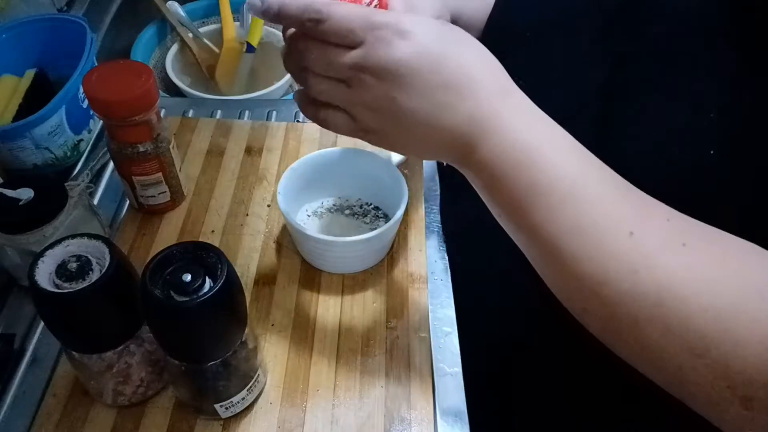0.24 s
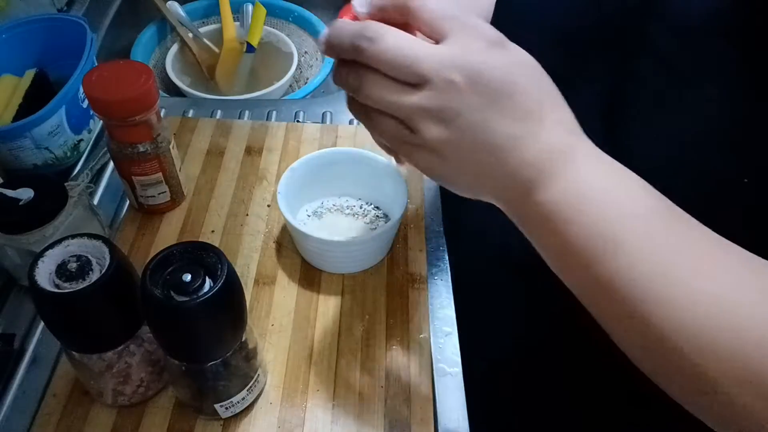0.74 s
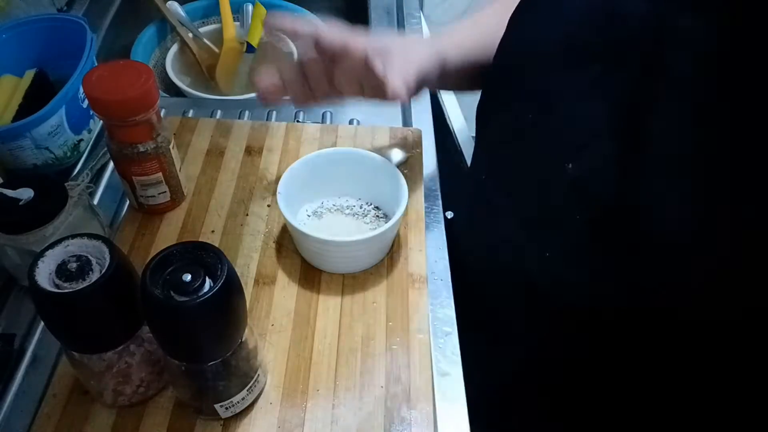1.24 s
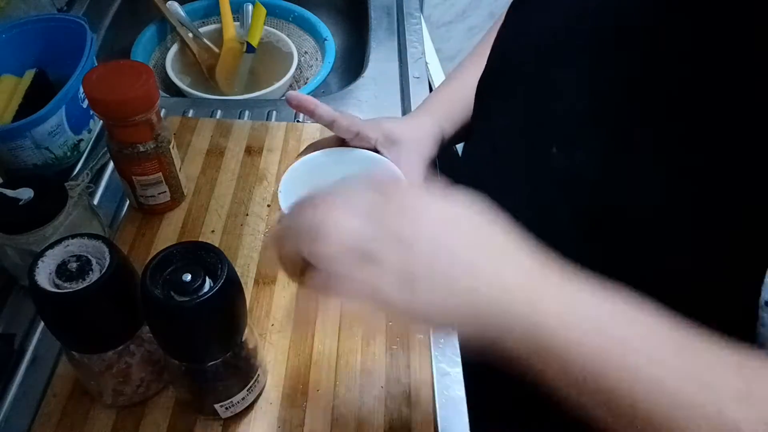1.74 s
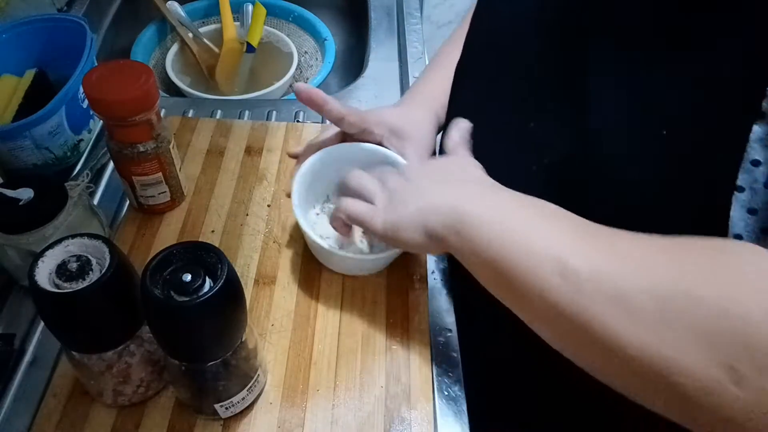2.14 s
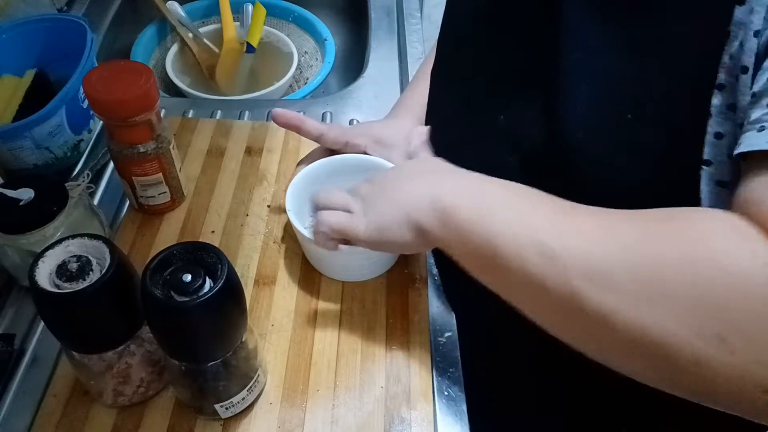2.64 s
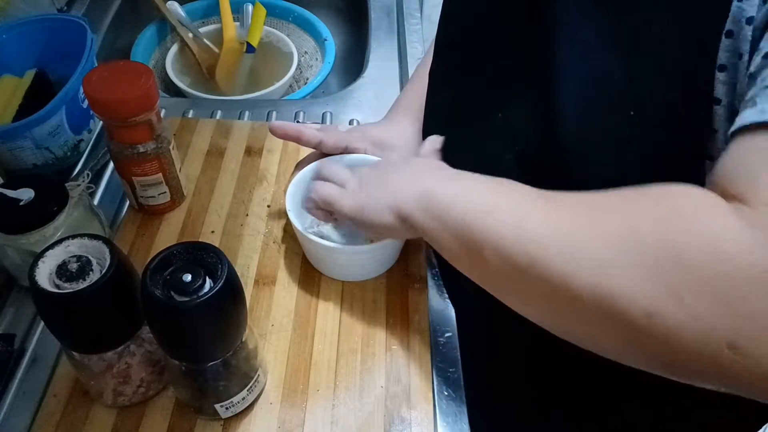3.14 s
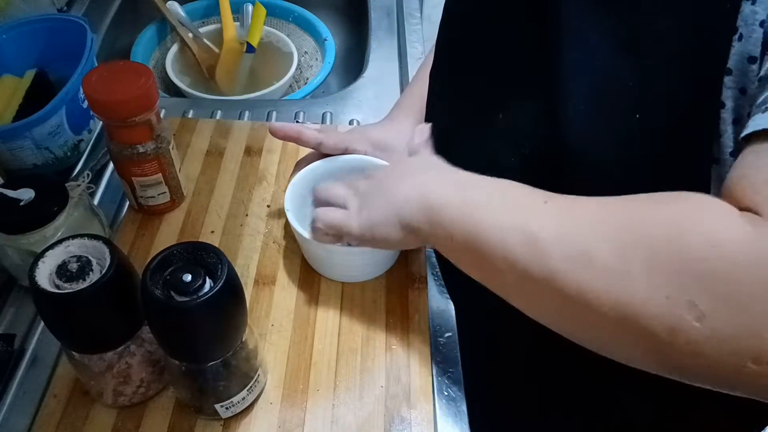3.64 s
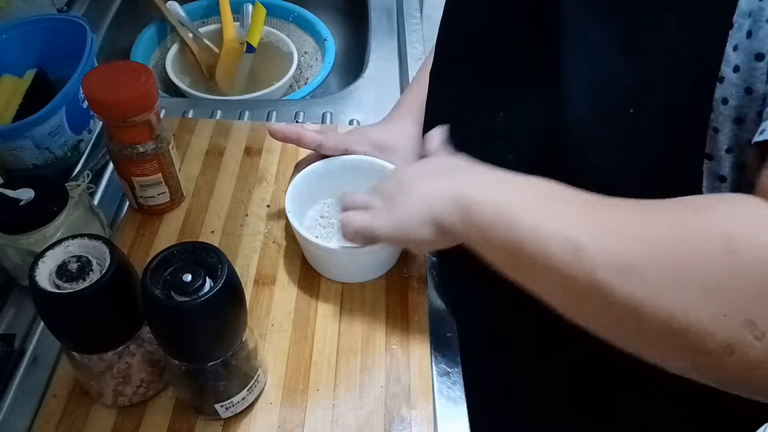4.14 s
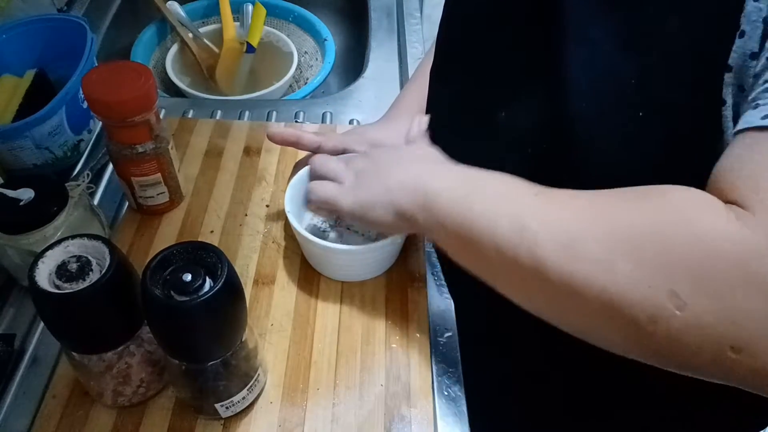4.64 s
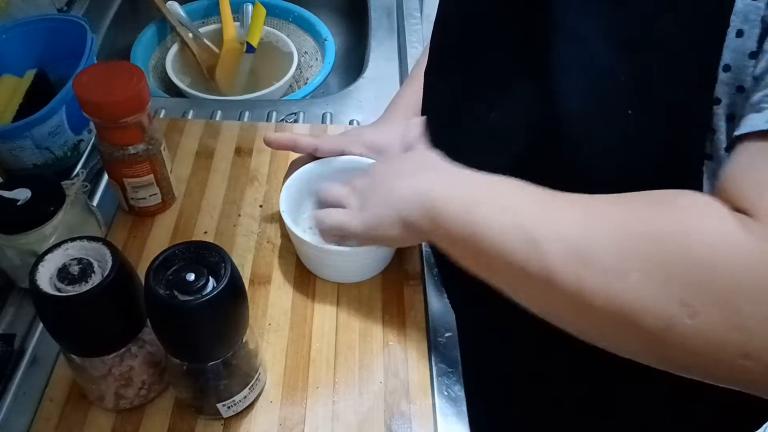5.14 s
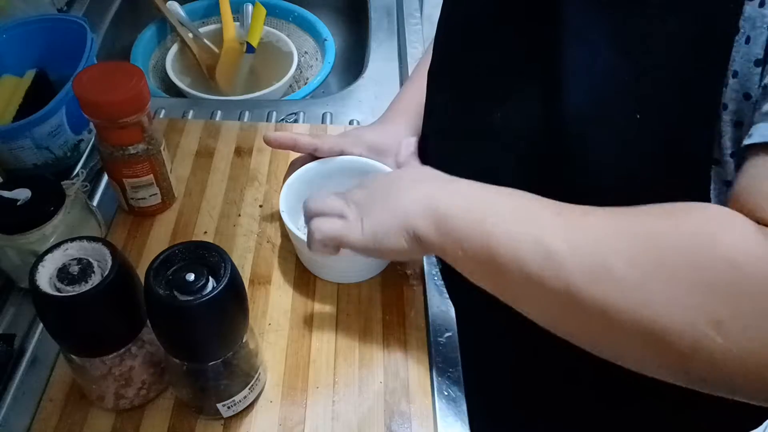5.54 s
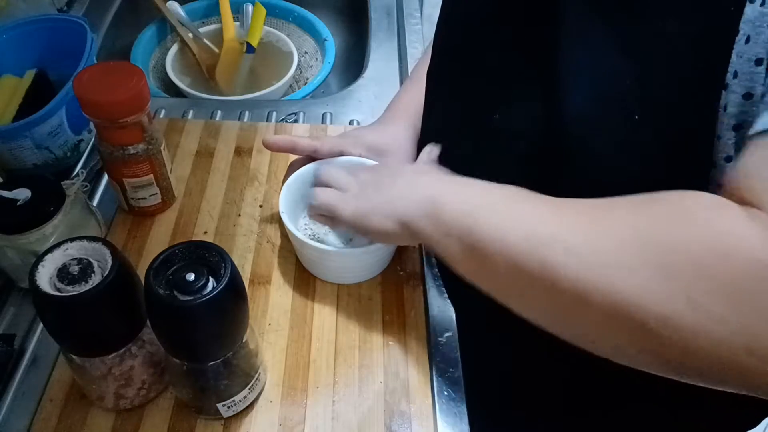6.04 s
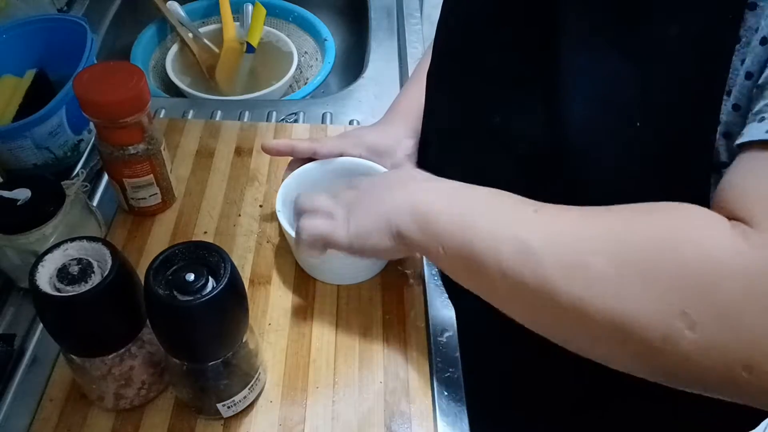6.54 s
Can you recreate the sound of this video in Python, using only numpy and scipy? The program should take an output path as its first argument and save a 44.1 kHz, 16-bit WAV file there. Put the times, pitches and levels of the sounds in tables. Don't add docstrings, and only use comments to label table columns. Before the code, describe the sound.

A plastic cap clicks shut, then fingers rasp through dry gritty spice in a ceramic bowl that knocks on a wooden board over a low hum.

```python
import sys
import numpy as np
from scipy import signal
from scipy.fft import rfft, irfft, next_fast_len
from scipy.io import wavfile
from scipy.ndimage import uniform_filter1d, map_coordinates

SR = 44100
rng = np.random.default_rng(int(sys.argv[2]) if len(sys.argv) > 2 else 0)


def elevation(decibels):
    levels = np.asarray(decibels, float)
    return 10 ** (levels / 20)


def inscribe(sig):
    pcm = np.round(np.clip(np.atleast_2d(sig).T, -1, 1) * 32767)
    wavfile.write(sys.argv[1], SR, pcm.astype(np.int16))


N = 298998


def bowl_knocks():
    # start_s, force_db, hardness_db, weight_db
    knock_events = [(1.6655, -33.5, 12, 8), (1.8654, -59, 9, 22), (2.6412, -31, 11, -2),
                    (2.7594, -38, -16, 4), (3.4223, -51, 19.5, 3), (4.142, -30, 12.5, 1),
                    (4.9766, -20, -2, -2), (5.002, -20.5, 13, 1), (5.0078, -29, -10, 2.5),
                    (5.0175, -24, 21, -9.5), (5.0282, -27, 14, 1), (5.0449, -38.5, 22, 7),
                    (5.0579, -35, 22, 3), (5.1308, -30, 3, -8), (6.316, -52, 21.5, 13), (4.555, -50, 12, 6),
                    (5.505, -51.5, 11, 7), (1.968, -62, 11, 3), (4.991, -29, 12, -3), (5.066, -36, 19, 1.5),
                    (5.08, -36, 20, 1), (5.095, -43, 18, 1), (5.161, -38, 4, -6), (2.776, -50, 8, -3),
                    (5.036, -34, 19, 0.5), (4.679, -61, 14, 3)]
    return contacts(knock_events, rise_s=0.00075, t60=0.014, rough=0.23, room_db=1.5,
                    gains_db=[-5.5, -3.5, -4.5, 1.1, -4.5])


def bowl_drags():
    # start_s, force_db, hardness_db, weight_db
    drag_events = [(1.4163, -72, 0.5, 12.5), (2.0089, -51, -10, 12), (2.36, -48, -5, 1),
                   (2.385, -46, -3, 1), (2.412, -47, -3, 3), (2.6023, -53, -5, -1), (3.7684, -39, -6, 4),
                   (3.82, -51.5, -2, 5), (4.1594, -28, 3, -8), (4.2041, -54.5, 16, 25.5),
                   (4.255, -46, 4, 9), (4.2905, -57, 12, 20), (4.6781, -65.5, -3, 19),
                   (4.9407, -45.5, -16, 4.5), (4.9842, -19.5, -11, -1.5), (5.0678, -34, 11, -8.5),
                   (5.0879, -40, -5, -3.5), (5.158, -41, -8, -3), (5.4592, -47.5, -11, 8.5),
                   (6.438, -56, -14, 22)]
    return contacts(drag_events, rise_s=0.0031, t60=0.098, rough=0.85, room_db=2.5,
                    gains_db=[-11, -4, -7, -1.4, -7.5])


def cap_snaps():
    # start_s, force_db, hardness_db, weight_db
    cap_events = [
        (.6694, -20.5, 5.5, -13),
        (.9058, -27.5, 14, -9),
        (1.1036, -64, 6, 10),
    ]
    return contacts(cap_events, rise_s=0.00025, t60=0.013, rough=0.24, room_db=4.5,
                    gains_db=[2.5, -0.2, 1.5, 5.5, -.5])


def contacts(table, rise_s, t60, rough, room_db, gains_db):
    # pitch_hz, width_hz, level_db
    counter_modes = [(66.4, 13, -11), (97, 18.8, 2), (131.4, 32.3, -3)]
    board_modes = [(232.8, 15.5, 1), (306.4, 35.2, -5.5), (345.8, 28.4, 1), (450.6, 71, -8)]
    bowl_modes = [(592, 107, -2.5), (824, 284, -7), (1056, 90, -6), (1162, 69, -7), (1390, 310, -11.5)]
    clack_modes = [(1586, 170, -2.5), (1850, 180, 3.5), (2090, 390, 0), (2453, 140, 2), (2706, 510, -1.5),
                   (3210, 58, -5.5)]
    # pitch_hz, density_db (per Hz)
    crack_spectrum = [(900, -64.5), (2500, -12.5), (3400, 7), (5700, 2.5), (7400, -3), (8500, -10),
                      (11000, -7.5), (13500, -9), (15800, -15), (17000, -56.5)]
    board_takes, clack_takes = 0.64, 0.27
    blow_at = 30
    bodies = (counter_modes, board_modes, bowl_modes, clack_modes)
    out = np.zeros((2, N + SR))
    t = np.arange(SR * 2 // 5) / SR

    def peak(x):
        return x / np.max(np.abs(x))

    for start_s, force_db, hard_db, weight_db in table:
        def reach(f):
            return (1j * f / (58 + 1j * f)) ** 3 / (1 + 1j * f / (3600 * elevation(.18 * hard_db))) ** 2

        grit = (1 - np.exp(-t / rise_s)) * elevation(-60 * t / t60) * rng.standard_normal(len(t))
        blow = np.arange(len(t)) == blow_at
        force = rough * grit / np.linalg.norm(grit) + (1 - rough) * blow
        crack = peak(filtered(force, lambda f: elevation(along(crack_spectrum, f))))
        dry = elevation(hard_db + gains_db[0]) * crack
        body_db = weight_db, board_takes * weight_db, 0, clack_takes * hard_db
        for modes, db, gain_db in zip(bodies, body_db, gains_db[1:]):
            body = filtered(force, lambda f: reach(f) * resonances(modes, f, scatter_db=1.5))
            dry += elevation(db + gain_db) * peak(body)
        out[:, round(start_s * SR) - blow_at:][:, :len(t)] += in_kitchen(elevation(force_db) * dry, room_db)
    return out[:, :N]


def lone_rings():
    # start_s, pitch_hz, peak_db, t60_s
    ring_events = [(0.669, 350, -9, 0.12), (.907, 2440, -26, 0.08), (1.104, 2750, -48, 0.07),
                   (1.668, 106.5, -22, 0.22), (1.667, 1165, -29, .1), (.671, 999, -23, .08),
                   (0.669, 1373, -23, .08), (1.864, 1200, -39, 0.037), (1.868, 102, -30, 0.11),
                   (2.372, 280, -40, 0.2), (2.640, 620, -17.5, 0.06), (2.758, 616, -28, 0.065),
                   (3.774, 338, -19, 0.085), (3.824, 77.6, -27, 0.076), (4.145, 1850, -24.5, 0.13),
                   (4.205, 64, -21, 0.35), (4.261, 347, -23.5, 0.14), (4.143, 2200, -27.5, .1),
                   (4.15, 1560, -34, .08), (4.997, 135, -15, .13), (.908, 720, -28, .06),
                   (4.994, 98, -8.5, 0.11), (5.020, 605, -22, 0.23), (5.077, 67, -29, 0.16),
                   (5.084, 102, -24, .12), (4.977, 575, -17, .06), (4.977, 1900, -28, .05),
                   (4.988, 1160, -26, .05), (5.024, 2430, -27, .19), (3.784, 754, -39, .12),
                   (3.797, 350, -29, .15), (3.822, 1525, -47, .08), (3.778, 1120, -38, .1),
                   (2.405, 290, -36, .1), (2.365, 700, -48, .12), (1.667, 7364, -46, .06),
                   (1.667, 3262, -34, .04), (1.667, 5950, -44, .04), (1.667, 711, -44, .12),
                   (1.436, 5900, -67, .04), (1.417, 6300, -65, .03), (1.5, 2850, -66, .1),
                   (.908, 2229, -31, .15), (.908, 2573, -33, .18), (4.218, 1150, -38, .07),
                   (.670, 1600, -24, .1), (.907, 487, -26, .06), (5.131, 2700, -42, 0.066),
                   (5.032, 2700, -28, 0.07), (2.655, 330, -27, .12)]
    rings = np.zeros(N + SR)
    t = np.arange(SR * 2 // 5) / SR
    for start_s, hz, db, t60 in ring_events:
        blur = 0.0032 * np.sqrt(hz)
        drift = uniform_filter1d(np.cumsum(rng.standard_normal(len(t))), size=14)
        envelope = elevation(db - 60 * t / t60) * (1 - np.exp(-2.2 * hz * t)) ** 2
        rings[round(start_s * SR):][:len(t)] += envelope * np.sin(2 * np.pi * hz * t + blur * drift)
    return in_kitchen(rings[:N], room_db=-6)


def thrown_grains():
    # start_s, level_db
    burst_events = [
        (3.3403, -59),
        (4.782, -67),
        (4.9672, -44.5),
        (5.002, -20),
        (5.0187, -7),
        (5.0354, -34),
        (5.0574, -17),
        (5.0794, -25),
        (6.316, -52),
    ]
    # pitch_hz, width_hz, level_db
    grain_modes = [(11100, 2200, -2.5), (14100, 2600, -2.5)]
    snaps = np.zeros(N + SR)
    t = np.arange(SR * 2 // 5) / SR
    for start_s, db in burst_events:
        noise = elevation(-60 * t / 0.011) * rng.standard_normal(len(t))
        burst = filtered(noise, lambda f: resonances(grain_modes, f))
        snaps[round(start_s * SR):][:len(t)] += elevation(db) * burst / np.max(np.abs(burst))
    return in_kitchen(snaps[:N], room_db=-15)


def stirring():
    # start_s, hold_s, speed_db, grit_db
    grip_moves = [
        (0.104, .03, -68.5, -9),
        (0.159, 0.047, -62.5, -11),
        (.39, .03, -89, 12),
        (.49, .11, -88, 20),
        (1.394, .05, -82, 4),
        (1.496, 0.05, -91, 19),
        (1.862, .01, -86, 4),
    ]
    # start_s, hold_s, speed_db, grit_db
    stir_moves = [(2.133, 0.062, -66.5, 6.5), (2.254, 0.059, -72, 6), (2.447, .1, -64.5, -3),
                  (2.94, .04, -66.5, -7), (3.043, 0.041, -60.5, -11.5), (3.16, 0.045, -71.5, -1),
                  (3.646, 0.051, -67.5, 4.5), (3.804, 0.041, -60.5, -0.5), (3.885, 0.12, -65.5, -1),
                  (4.134, .02, -63, 5.5), (4.54, 0.026, -58.5, -0.5), (4.925, 0.059, -69.5, 15.5),
                  (5.202, 0.029, -63, 4.5), (5.327, .1, -65.5, 0.5), (5.462, 0.026, -61, 2),
                  (5.58, 0.024, -70, 3), (5.737, 0.064, -63.5, -2), (5.93, .03, -69.5, -1),
                  (5.99, 0.043, -61.5, -8), (6.12, .1, -92, 15), (6.378, 0.034, -62.5, 4),
                  (6.56, 0.036, -65, 2), (6.736, .05, -62.5, -2)]
    # start_s, hold_s, speed_db, grit_db
    jerk_moves = [(1.104, 0.021, -67, 0), (2.008, 0.11, -74.5, 14.5), (2.362, 0.065, -67.5, 13),
                  (2.607, 0.018, -62.5, 5), (2.72, 0.14, -64.5, 1.5), (3.338, 0.075, -62, -5),
                  (3.425, 0.094, -62.5, 3), (4.472, .05, -60.5, -0.5), (4.786, .02, -63, -3.5),
                  (5.668, .04, -63.5, -1), (6.325, .02, -69, 4.5), (6.668, .02, -63.5, -0.5)]
    # time_s, level_db
    hand_press = [(0, -70), (.9, -63), (1.6, -66), (2.0, -55), (3.2, -59.5), (3.5, -56), (4.9, -59.5),
                  (5.1, -53), (5.8, -58.5), (6.55, -56)]
    # pitch_hz, density_db (per Hz)
    fizz_spectrum = [(2650, -51.5), (4500, -13.5), (5910, 3), (8750, -3.5), (11200, 0), (12100, -2.5),
                     (15700, -1), (16300, -33)]
    rasp_spectrum = [(650, -25.5), (1100, -11), (1550, -6.5), (1700, -5.5), (2520, -6.5), (3060, -14),
                     (3280, -13.5), (3920, -9.5), (7000, -18), (9100, -43), (15400, -120)]
    rub_spectrum = [(90, -33.5), (140, -9), (190, -24), (260, -2.5), (380, -9.5), (520, -10), (860, -13.5),
                    (1000, -18.5), (1350, -24.5), (1600, -38.5), (3300, -120)]
    # pitch_hz, width_hz, level_db
    wall_modes = [(2104, 160, -4), (3113, 320, -5), (4344, 89, -9), (5810, 67, -11.5)]
    rise, jerk_rise, fizz_fall, rasp_fall = 330, 1100, 200, 130.5
    drag_db, drag_grows = -73, 1.8

    press_db = curves(hand_press)[0]
    moves = [*grip_moves, *stir_moves]
    lumps = wobble(25)

    def all_moves(fall, grit_share):
        smooth = strokes(moves, rise, fall, grit_share)
        return np.hypot(smooth, strokes(jerk_moves, jerk_rise, fall, grit_share))

    speed = all_moves(fizz_fall, 0)
    resting = elevation(drag_db + drag_grows * (press_db - press_db.max()))
    grit = all_moves(rasp_fall, 0.93) + resting
    fine = patchy(rush(fizz_spectrum, grain_db=3.2, rate=1500), patchy_db=1.6)
    fizz = speed * elevation(1.1 * lumps) * fine
    rasp = patchy(rush(rasp_spectrum, grain_db=2.3, rate=370), patchy_db=3)
    wall = 0
    for mode in wall_modes:
        ring = unit(filtered(rasp, lambda f: resonances([mode], f) ** 2))
        wall = wall + elevation(mode[2] + 3.9 * wobble(10.0)) * ring
    rub = elevation(press_db + .8 * wobble(15)) * rush(rub_spectrum, grain_db=1.5, rate=120)
    return fizz + grit * elevation(0.47 * lumps) * (rasp + elevation(-14) * wall) + rub


def squeaks():
    # start_s, hold_s, level_db, upper_over_lower_db
    slip_moves = [(.39, 0.033, -74, -5), (.495, .1, -75, -14), (1.415, .03, -67.5, -13),
                  (1.5, 0.043, -74, -13), (1.715, .025, -58, -27), (4.79, .02, -80, 13),
                  (6.67, .02, -82, 16), (1.87, .01, -88, 4), (1.96, .04, -77, -5), (2.9, 0.082, -86, 13),
                  (3.04, .04, -85, 20), (3.19, .05, -82, 11.5)]
    # pitch_hz, width_hz, level_db
    glaze_modes = [(3154, 300, 0), (6020, 330, 0)]
    out = 0
    for k, mode in enumerate(glaze_modes):
        noise = rng.standard_normal((2, N))
        ring = unit(paired(filtered(noise, lambda f: resonances([mode], f) ** 2)))
        out = out + strokes(slip_moves, rise=350, fall=259.5, share=k) * ring
    return out


def fridge():
    # time_s, level_db
    hum_load = [(0, -46), (.2, -45), (2.1, -43.5), (3.3, -45), (3.7, -49.5), (4.15, -43.5), (5.6, -45.5),
                (6.25, -47.5), (6.6, -42), (6.78, -45.5)]
    # pitch_hz, density_db (per Hz)
    rumble_spectrum = [(20, -48), (40, -32), (62, -16.5), (80, -12.5), (100, -6), (125, -6.5), (150, -26),
                       (190, -24.5), (260, -20), (330, -38.5), (450, -34.5), (900, -38.5), (1500, -120)]
    hiss_spectrum = [(300, -24.5), (1000, 2), (3000, 2.5), (8000, -7), (16000, -6), (17000, -120)]
    t = np.arange(N) / SR
    drift = .3 * wobble(3)
    hum_level = np.sqrt(2) * elevation(curves(hum_load)[0] + 0.23 * wobble(7.8))
    hum = hum_level * np.sin(2 * np.pi * 100.1 * t + drift)
    mains = elevation(-66 - 1.1 * t) * np.sin(2 * np.pi * 50 * t)
    rumble = elevation(-49.5 + .8 * wobble(5)) * rush(rumble_spectrum)
    return hum + mains + rumble + elevation(-78) * rush(hiss_spectrum)


def in_kitchen(dry, room_db):
    # pitch_hz, level_db
    room_share = [(100, -6.5), (500, 1), (2000, 5), (14000, 11.5)]
    heard = filtered(dry, lambda f: elevation(room_db + along(room_share, f)))
    wet = signal.fftconvolve(np.pad(heard, (90, 0))[None], tail(SR // 3), axes=1)[:, :len(dry)]
    return wet + [dry, 0 * dry]


def tail(length, early_db=9, early_t60=0.022):
    # pitch_hz, t60_s
    kitchen_decay = [(100, 0.46), (400, 0.24), (2000, 0.26), (6000, 0.24), (14000, .22)]
    hz, t, z = signal.stft(rng.standard_normal((2, length)), SR, nperseg=256)
    decay = elevation(-60 * t / along(kitchen_decay, hz)[:, None])
    pair = signal.istft(z * decay, SR, nperseg=256)[1][:, :length]
    pair = pair * (1 + elevation(early_db - 60 * np.arange(length) / SR / early_t60))
    return pair / np.linalg.norm(pair[0])


def strokes(rows, rise, fall, share):
    t = np.arange(0, N + 64, 64) / SR
    power = 0
    for start_s, hold_s, db, extra_db in rows:
        before = np.clip(start_s - t, 0, 1)
        after = np.clip(t - start_s - abs(hold_s), 0, 1)
        power = power + elevation(db + share * extra_db - rise * before - fall * after) ** 2
    return np.interp(np.arange(N) / SR, t, np.sqrt(power))


def patchy(x, patchy_db):
    z = signal.stft(x, nperseg=512)[2]
    field = uniform_filter1d(rng.standard_normal(z.shape[1:]), size=6, axis=0)
    field = uniform_filter1d(field, size=7, axis=1)
    return unit(signal.istft(z * elevation(patchy_db * unit(field)), nperseg=512)[1][:, :N])


def rush(spectrum, grain_db=0, rate=900):
    pair = rng.standard_normal((2, N)) * elevation(grain_db * wobble(rate))
    return unit(paired(filtered(pair, lambda hz: elevation(along(spectrum, hz)))))


def paired(pair, lead_s=4 / 44100):
    # pitch_hz, likeness (0 to 1)
    likeness = [(60, 0.95), (250, 0.83), (600, 0.58), (1500, 0.1), (5000, 0.14), (14000, 0.1)]

    def mid_side(hz):
        turn = np.arccos(np.clip(along(likeness, hz), -1, 1)) / 2
        return np.array([np.cos(turn), np.sin(turn)])

    def lead(hz):
        return np.exp(1j * np.pi * hz * lead_s * np.array([[1], [-1]]))

    mid, side = filtered(pair, mid_side)
    return filtered(np.array([mid + side, mid - side]), lead)


def resonances(modes, f, scatter_db=0):
    total = 0
    for k, (center, width, db) in enumerate(modes):
        strength = (-1) ** k * elevation(db + scatter_db * rng.standard_normal())
        total = total + strength * 1j * f * width / (center * center - f * f + 1j * f * width)
    return total


def filtered(x, response):
    m = next_fast_len(x.shape[-1] + SR // 8, real=True)
    return irfft(rfft(x, m) * response(np.fft.rfftfreq(m, 1 / SR)), m)[..., :x.shape[-1]]


def wobble(rate):
    at = np.arange(0, N + 8, 8)
    knots = rng.standard_normal(int(N * rate / SR) + 5)
    return np.interp(np.arange(N), at, map_coordinates(knots, [at * rate / SR]))


def curves(rows):
    s, *cols = np.transpose(rows)
    return [np.interp(np.arange(N) / SR, s, c) for c in cols]


def along(points, hz):
    f, v = np.transpose(points)
    return np.interp(np.log(hz + 1), np.log(f + 1), v)


def unit(x):
    return x / np.sqrt(np.mean(x ** 2) + 1e-20)


def scene():
    def thin_deep_bass(hz):
        return -hz ** 2 / (50 ** 2 - hz ** 2 + 60j * hz)

    def port(hz):
        tilt_db = along([(100, 0.63), (500, 0.086), (8000, 0.96), (13000, 1.2)], hz)
        return elevation(np.array([[1], [-1]]) * tilt_db)

    struck = bowl_knocks() + bowl_drags() + cap_snaps() + lone_rings() + thrown_grains()
    struck = paired(filtered(struck, thin_deep_bass))
    return filtered(struck + stirring() + squeaks() + fridge(), port)


def roll_off(x):
    return signal.sosfilt(signal.butter(12, 16830, fs=SR, output="sos"), x)


def record(dry):
    heard = filtered(dry, lambda hz: (1j * hz / (30 + 1j * hz)) ** 2)
    soft = heard / (1 + np.abs(heard / .75) ** 4) ** (1 / 4)
    return roll_off(soft)


dry = scene()
out = record(dry)
inscribe(out)
```